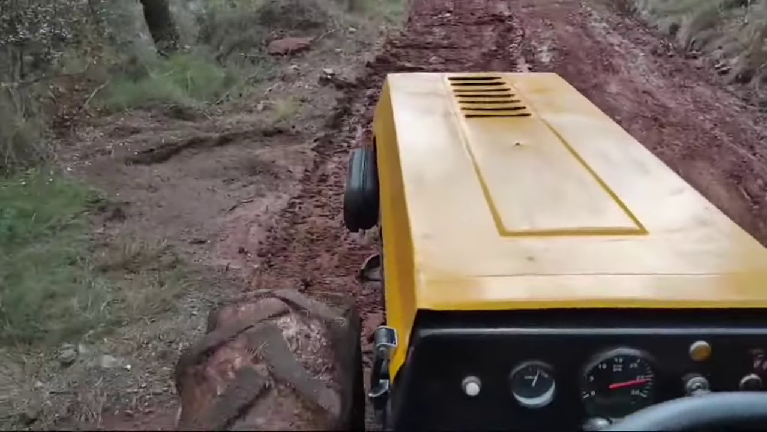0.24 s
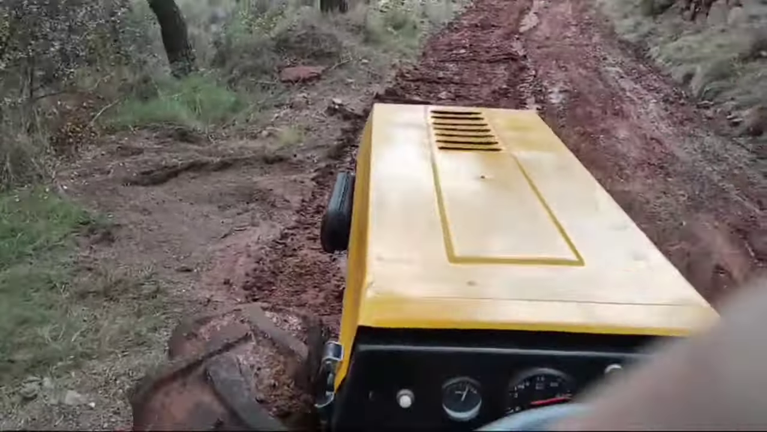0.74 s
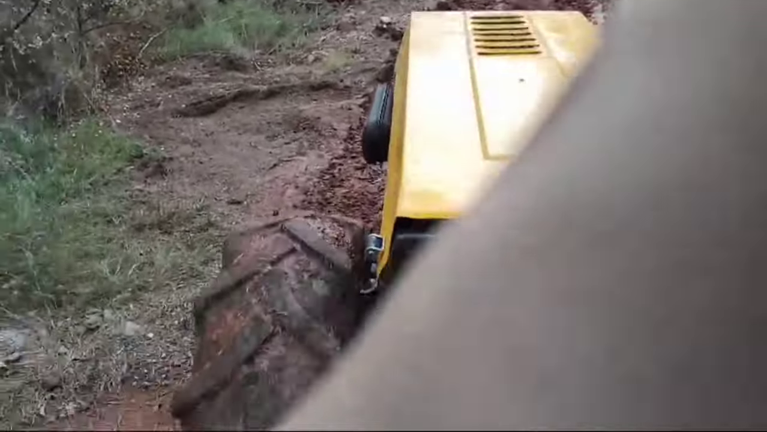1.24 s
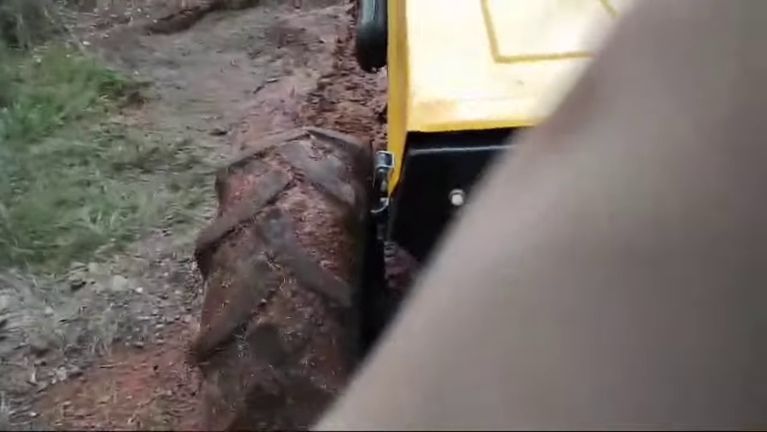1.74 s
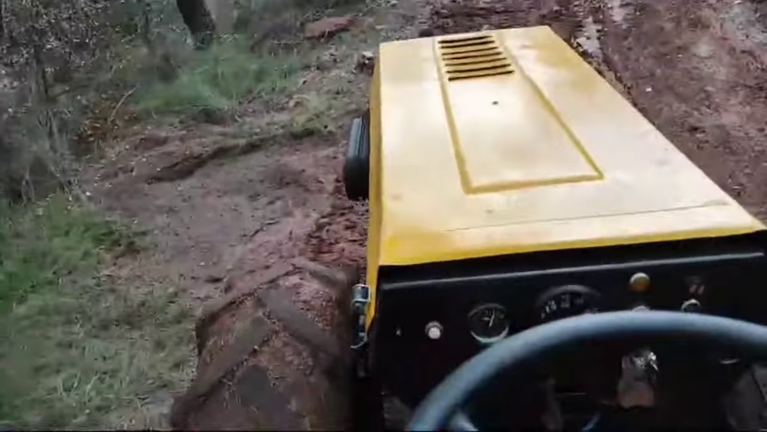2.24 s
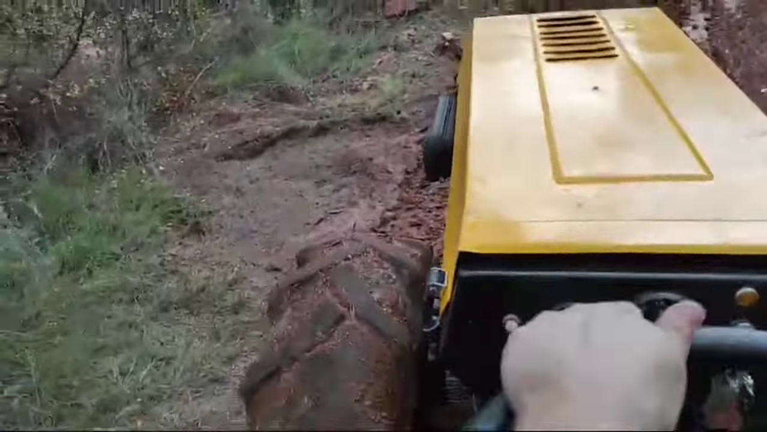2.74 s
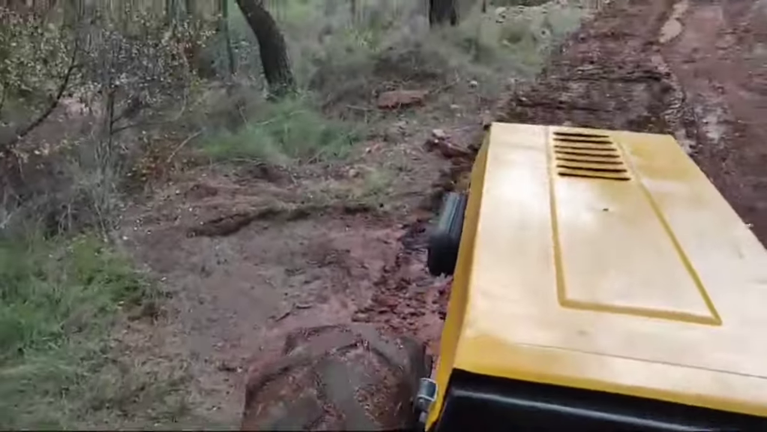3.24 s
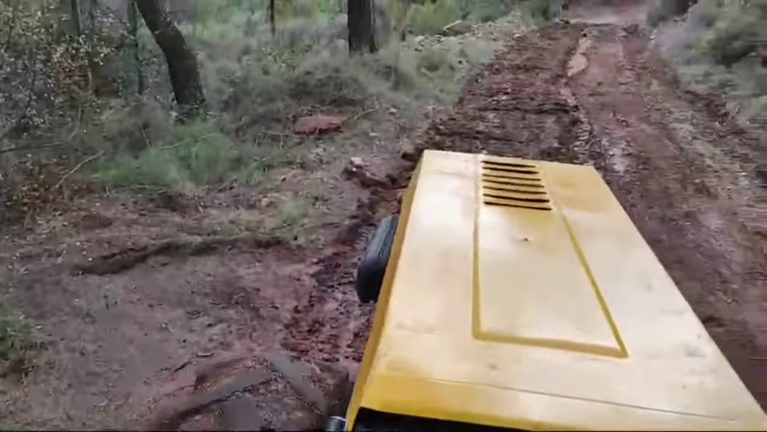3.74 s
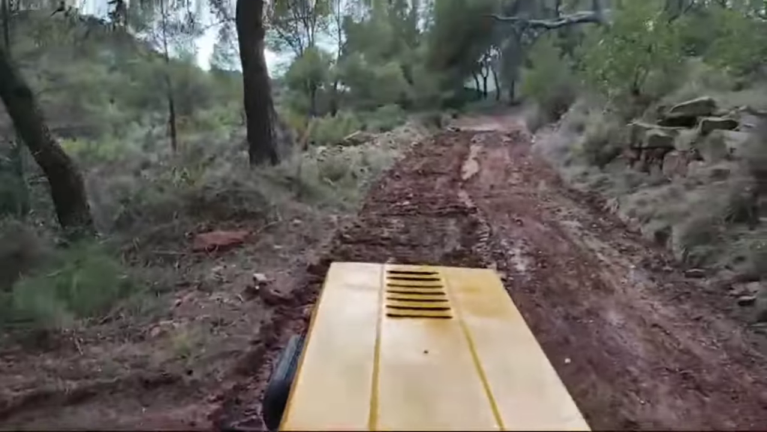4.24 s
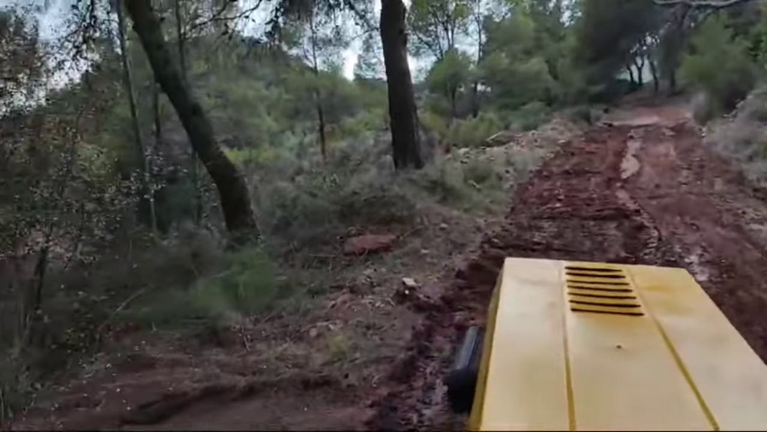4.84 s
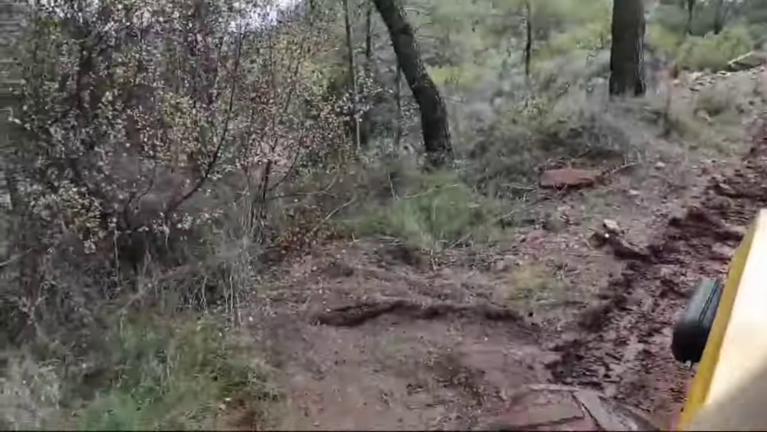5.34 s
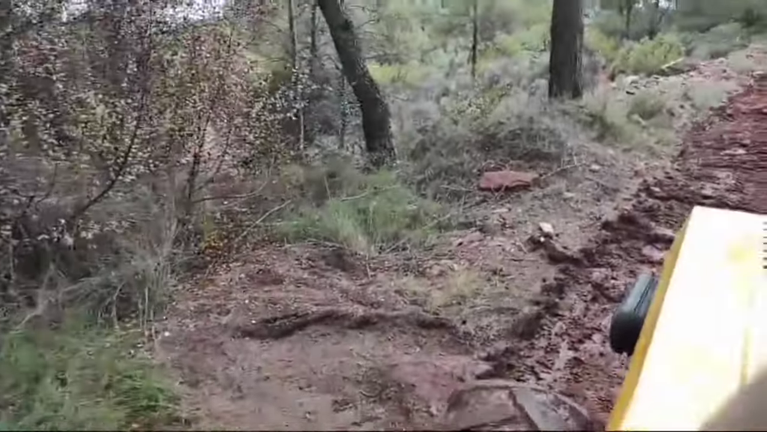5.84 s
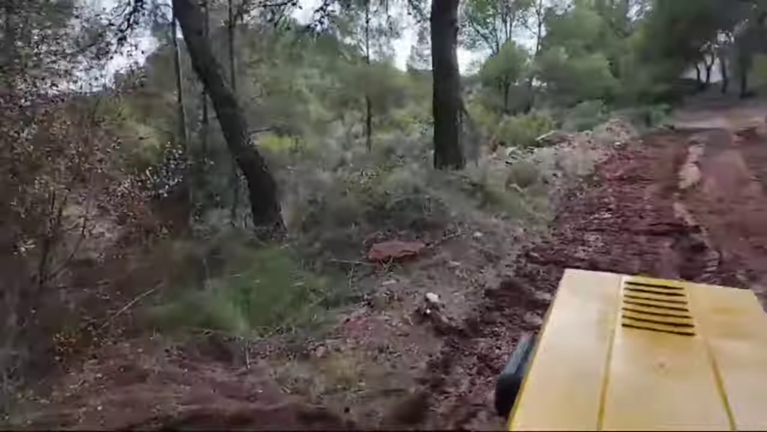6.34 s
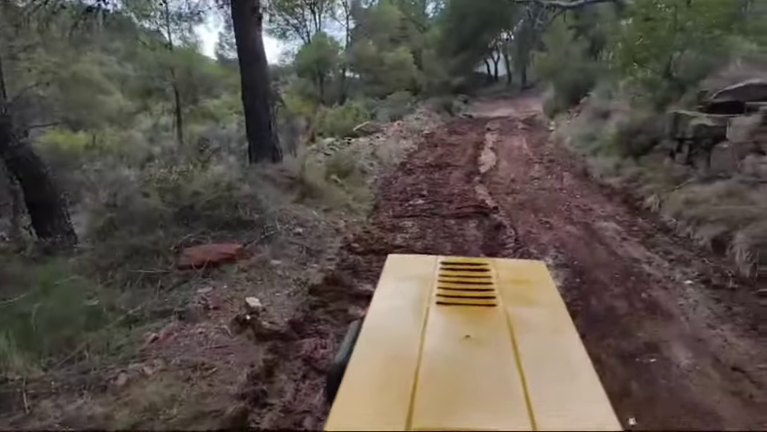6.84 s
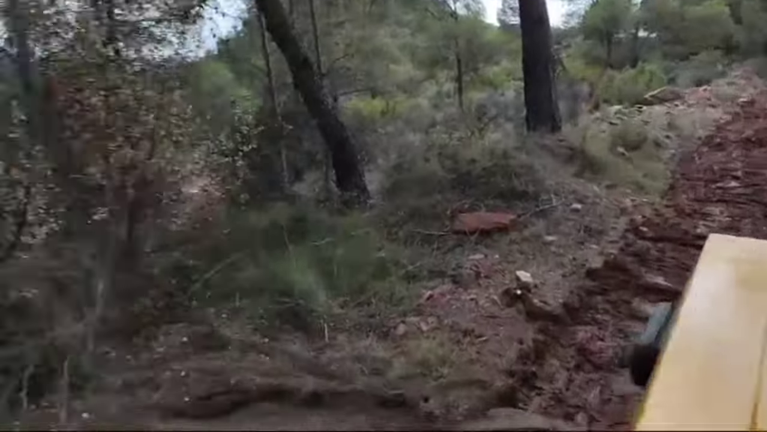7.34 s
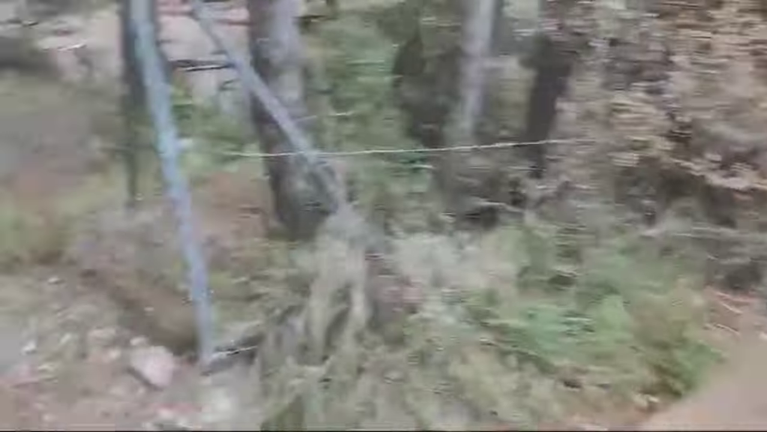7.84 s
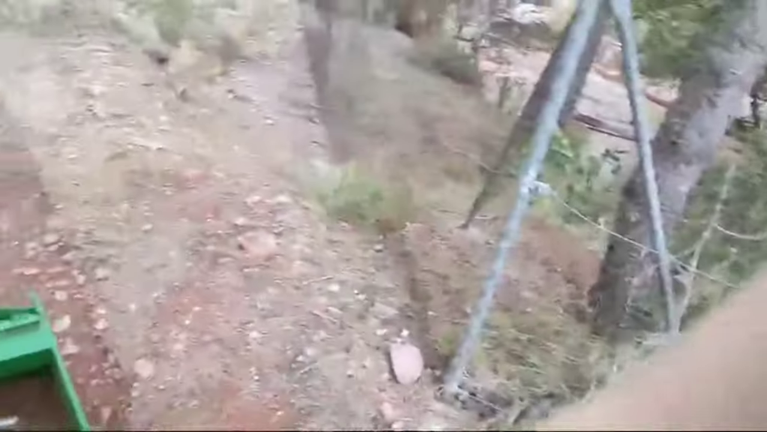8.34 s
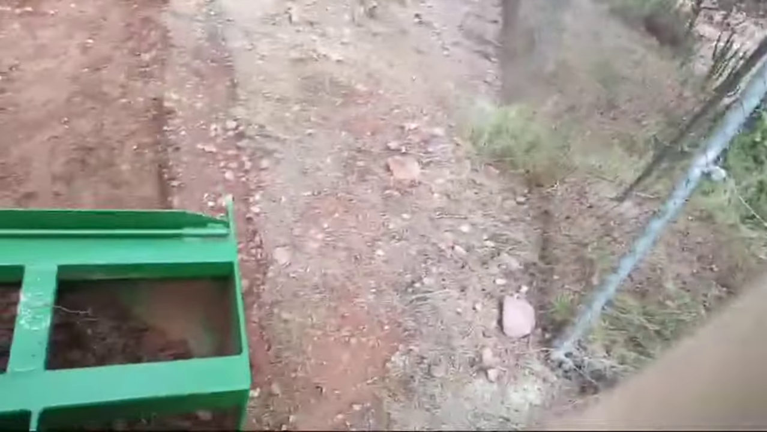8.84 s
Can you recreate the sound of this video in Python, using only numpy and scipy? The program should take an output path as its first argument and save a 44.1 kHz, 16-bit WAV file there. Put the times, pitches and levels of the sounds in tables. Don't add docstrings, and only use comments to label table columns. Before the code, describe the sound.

Heard from the driver's seat, a diesel tractor engine putters fast and evenly, clattering and knocking, its tone shifting as the head turns.

```python
import sys
import numpy as np
from scipy import signal
from scipy.fft import rfft, irfft, next_fast_len
from scipy.io import wavfile
from scipy.ndimage import uniform_filter1d, map_coordinates

SR = 44100
rng = np.random.default_rng(int(sys.argv[2]) if len(sys.argv) > 2 else 0)


def invert_db(level):
    return 10 ** (np.asarray(level, dtype=float) / 20)


def persist_wave(psi):
    counts = np.round(np.clip(psi, -1, 1) * 32767).astype(np.int16)
    wavfile.write(sys.argv[1], SR, np.atleast_2d(counts).T)


N = 400869
HZ = np.fft.rfftfreq(next_fast_len(N), 1 / SR) + 1e-3

# (time [s], four-stroke cycles [1/s])
SPEED_HZ = [(0, 14.868), (.5, 14.851), (1.3, 14.755), (2.2, 14.823), (2.9, 14.748), (3.8, 14.787),
            (4.8, 14.794), (5.5, 14.868), (6.3, 14.8), (7.1, 14.802), (7.8, 14.725), (8.4, 14.701),
            (9.09, 14.573)]
START_CYCLE, CYCLE_HZ = .095, 14.8
# (time [s], turn left [-1..1], nod down [-1..1], lean back [-1..1], lean out [-1..1])
HEAD_POSE = [(0.0, 0.087, 1.2, 0.61, -0.32), (0.5, 0.15, 0.98, 0.65, -0.42), (1.2, -0.18, 0.3, 0.34, -0.61),
             (1.55, 0.15, 0.53, 0.94, 0.14), (1.9, 0.072, 0.67, -0.13, 0.12),
             (2.8, -0.18, 0.42, -0.027, 0.88), (3.5, -0.11, 0.16, -0.66, 0.27),
             (4.0, -0.35, -0.41, -0.9, -0.33), (4.8, -0.3, -0.29, -0.97, 0.26),
             (5.2, -0.055, 0.054, -0.17, 0.51), (5.7, -0.11, 0.14, 0.15, 0.54),
             (6.1, 0.42, 0.11, 0.61, 0.29), (6.6, -0.15, -0.52, 0.14, -0.55),
             (7.3, 0.0035, -0.49, 0.39, -0.22), (7.7, 0.64, -0.28, 0.51, 1.17),
             (8.1, 0.74, 0.37, 0.15, 0.22), (8.5, 0.74, 0.19, -0.28, -1.07), (9.09, 1, 0.52, -0.21, -1.2)]
# (rest [dB], per turn [dB], per nod [dB], per lean back [dB], per lean out [dB])
PART_LEVELS_DB = [
    (-16.5, -3.5, -0.5, 2, 0),
    (-27.5, 0, -0.5, 1, -0.9),
    (-23, -1.5, 0.4, 4, 0.3),
    (-28.5, 4.5, -2.5, -3.5, 0.5),
    (-27.5, -3, 5.5, 0, 0.1),
    (-29.5, -5.5, -2.5, 1, -1.5),
    (-33, 3.5, 2.5, -3, 0.5),
    (-28, -4, 3.5, -2.5, 1.2),
    (-28, 1.2, 1.25, -0.5, 0.3),
    (-28, 3, -1, -2.5, 3),
]
# (rest [dB], per turn [dB], per nod [dB], per lean back [dB], per lean out [dB])
PART_PANS_DB = [
    (5, 5, -2.1, 1, -0.5),
    (7.5, 1.5, -1, 1.5, 0),
    (4, 3.5, 0, 1.5, -2.5),
    (2, 0.5, 1.5, -1.5, -1.5),
    (7.5, 4, -6.5, 5.5, 3.5),
    (13.5, -1, 4, 0, 4),
    (19, 6, -9, -13, 13),
    (3.5, -5.5, 2.5, -3, 0.5),
    (-1.5, 4, -1.5, 0, 1.5),
    (7, 13, -4.5, -3, 7),
]
# (at rest [s], per turn [s], per nod [s])
PORT_LAG_S = (.00004, -0.0003, 0.00013)
# (frequency [Hz], left [dB], right [dB])
PORT_COLOUR = [(1355, -6, -5.5), (1710, 1, -14), (3010, -5, -14.5), (4390, -11, -7), (4300, -4.5, -7.5),
               (6400, -9.5, -3.5), (7470, -5.5, 5), (8380, 3.5, -1), (9160, -1.5, -1), (9510, -10, -41),
               (10600, -20, -40), (10630, -15.5, -43), (12300, -33, -21), (15300, -32, -38)]
FAN_DB, FAN_PER_TURN_DB = -45.5, 0.5
# (time [s], peak level [dB], frequency [Hz])
LOW_THUDS = [(0.392, -19, 152), (0.525, -13, 152), (0.726, -28, 178), (0.827, -8.5, 181),
             (1.474, -31, 163), (1.563, -31, 169), (1.812, -19, 151), (1.9, -15, 159), (2.015, -24, 161),
             (2.401, -13, 148), (2.666, -19, 145), (2.758, -31, 162), (3.603, -16, 179), (3.701, -18, 145),
             (4.249, -26, 162), (4.514, -22, 166), (5.53, -30, 167), (6.275, -32, 161), (6.838, -16, 151),
             (7.083, -23, 162), (7.964, -35, 161), (8.582, -32, 166)]

# (start [s], end [s])
STANCES_S = [
    (0.5, 1.4),
    (1.1, 2.57),
    (3, 4.7),
    (5.5, 7.55),
    (8, 10),
]
STANCE_TURN_S = 0.31
# (frequency [Hz], peak [share of cycle], level [dB], left minus right [dB])
PANEL_RINGS = [
    [(855, .94, -28.5, 5), (830, .22, -36, 3), (700, .9, -39, 4), (1010, .58, -40, 9), (1130, .85, -40, 6)],
    [(858, .95, -29, 3), (850, .22, -35, 2), (960, .86, -37, 12), (1010, .64, -39, 12), (1400, .57, -41, 6),
     (1900, .6, -42, 12)],
    [(1140, .97, -33, 8), (1140, .8, -37, 9), (615, .64, -32.5, -2), (860, .96, -34, 1), (705, .42, -38, 0),
     (1210, .38, -38, 10), (1940, .6, -40, 12)],
    [(1035, .62, -30, 13), (1100, .77, -30.5, 7), (1045, .94, -30.5, 12), (595, .85, -36, -3),
     (595, .05, -37, -3)],
    [(1290, .55, -37, 12), (1270, .86, -37, 9), (845, .93, -33, 7), (605, .83, -33, 1), (420, .82, -33, 5),
     (510, .6, -38, 5), (700, .3, -38, 3)],
]
PANEL_RISE_CYCLES, PANEL_FALL_CYCLES, PANEL_SCATTER_DB, PANEL_SLIP_RAD = .06, .09, 1.8, .4

# (onset [share of cycle], level [dB], decay [cycles])
VALVE_BLOWS = [(.52, 8, 0.19), (.74, 6.3, 0.19), (0.95, 5.5, 0.27), (.86, 2.5, 0.27)]

# (frequency [Hz], width [Hz], level [dB])
SUMP_MODES = [(548, 60, -2), (587, 20, 1), (621, 42, -1), (696, 110, 1)]
BLOCK_MODES = [(800, 67, -8.5), (829, 43, -2), (863, 23, -4), (940, 100, -2.5)]
BONNET_MODES = [(1006, 130, 0), (1079, 52, 1), (1137, 21, 0)]
HEAD_MODES = [(1216, 170, 10.5), (1321, 14, 13.5), (1230, 41, -18), (1470, 25, -26)]
COMBUSTION_BLOWS = [(.55, .15), (.75, .1), (.9, .08), (.15, .08)]
# (steady bed [dB], then each of four blows [dB])
CASTING_DRIVE_DB = [
    (9, -29, 2, -1, -15),
    (-4.5, -26, -4, -8.5, -1),
    (-4, -4.5, -5, 3, -28),
    (12, 6, -17, 3, -14),
]
# (multiple of cycle rate [-], level against ring [dB])
WHINE_LINES = [
    [(40, -10), (42, -16.5), (43.3, -16.5), (48, -12.5)],
    [(57.86, -11.5), (55.9, -12.5)],
    [(71.2, -15), (76.3, -10), (66.9, -13)],
    [(86, -19)],
]
WHINE_WANDER_RAD, WHINE_SWELL_DB = 0.26, 3
# (onset [share of cycle], level against one cycle of rattle [dB])
FIRING_RAPS = [
    [(.58, -18.5)],
    [(.86, -16.5)],
    [(.55, -15.5), (.87, -11)],
    [(.57, -13), (.85, -17)],
]
RAP_SCATTER_DB = 2

# (multiple of cycle rate [-], level [dB])
GAS_HARMONICS = [(1, -30), (2, -18), (3, -11), (4, -14), (5, -8), (6, -16.5), (7, -11), (8, -15),
                 (9, -18.5), (10, -23), (11, -11.5), (12, -8.5), (13, -20.5), (14, -5), (15, 3.5),
                 (16, -2.5), (17, -4), (18, -9), (19, -1.5), (20, -8), (21, -12), (22, -9), (23, -13),
                 (24, -12), (25, -14), (26, -26), (27, -12.5), (28, -6), (29, -16), (30, -27)]
INTAKE_GULPS = [(.148, .76), (.285, -.73), (.466, -.74), (.983, -1)]
EXHAUST_PUFFS = [(.17, -.62), (.394, 1), (.46, .47), (.692, -.7)]
MUFFLER_SLAPS = [(.285, -.58), (.576, .5), (.661, .53), (.703, -1)]
# (frequency [Hz], level [dB])
RUMBLE_COLOUR = [(30, -35), (110, -12.5), (150, -7.5), (200, -4.5), (280, -4), (350, -1), (430, -2),
                 (520, -10.5)]

# (frequency [Hz], mid need over mean [dB], side need over mean [dB], step over band rms [dB])
MUTE_LIMITS = [(700, -40, -40, -18), (1500, -30, -30, -11), (2500, -12, -12, -5), (3300, -6, -6, -1),
               (4300, -4, -4, 0), (5400, -5.5, -5.5, -1), (6400, -7.5, -7.5, -4), (7000, -18, -18, -8),
               (9300, -16, -16, -8), (9800, 6, 6, 3), (10300, 5, 5, 3), (10900, 2, 2, 3), (12500, 1, 1, 3),
               (14500, 0, 0, 3), (15300, 5, 5, 3)]
MUTE_CHANCE_DB, MUTE_SHARED = 4.5, .9
# (time [s], relief [dB])
MUTE_RELIEF = [(0, -1), (1.4, -1), (1.8, 2), (2.3, -2), (3.7, -3), (4.3, 2), (5.8, 3), (6.4, -1), (7.2, -1),
               (7.6, 4), (9.09, 2)]
MUTE_RELIEF_HZ = (9500, 10200, 11400, 12200)


def curves(table):
    s, *columns = np.transpose(table)
    return [np.interp(np.arange(N) / SR, s, c) for c in columns]


def posed(table):
    table = np.array(table)
    return table[:, :1] + table[:, 1:] @ np.array(curves(HEAD_POSE))


def colour(x, gain):
    size = next_fast_len(N)
    y = irfft(rfft(x, size) * gain, size)[..., :N]
    return y / np.sqrt(np.mean(y ** 2, axis=-1, keepdims=True))


def shape(hz, db):
    return invert_db(np.interp(np.log(HZ), np.log(hz), db))


def band(lo_hz, hi_hz, order=4):
    return 1 / np.sqrt((1 + (lo_hz / HZ) ** (2 * order)) * (1 + (HZ / hi_hz) ** (2 * order)))


def walk(rate_hz):
    k = int(SR / rate_hz)
    held = np.repeat(rng.standard_normal(N // k + 1), k)
    return 1.15 * uniform_filter1d(uniform_filter1d(held, k), k)[:N]


def pair(x, like):
    like = np.clip(like, 0, 1)
    return np.sqrt(like) * x[0] + np.sqrt(1 - like) * x[1:]


def place(x, db, pan_db, like):
    gain = invert_db(np.array([pan_db, -pan_db]) / 2)
    return x * gain * invert_db(db) * 2 / np.sqrt(np.sum(gain ** 2, axis=0) + 2 * like)


def gate(cycle, blows, bed_db, scatter_db):
    out = invert_db(bed_db)
    for share, db, decay_cycles in blows:
        since = cycle + 1 - share
        strength = invert_db(db + scatter_db * rng.standard_normal(200))[since.astype(int)]
        out = out + strength * np.exp(-(since % 1) / decay_cycles)
    return out


def fan(turn):
    hiss = colour(rng.standard_normal((2, N)), band(8200, 17400, order=8) * shape([10000, 15500], [0, -8]))
    return place(hiss * invert_db(0.69 * walk(9.0)), FAN_DB + FAN_PER_TURN_DB * turn, np.full(N, 2.5), 0)


def thuds():
    out = np.zeros(N)
    t = np.arange(int(.2 * SR)) / SR
    swell = t / 0.025 * np.exp(1 - t / 0.017)
    for s, db, hz in LOW_THUDS:
        i = int(s * SR)
        out[i:i + len(t)] += invert_db(db - 2.5) * swell * np.sin(2 * np.pi * hz * t)
    return place(out, 0, np.full(N, 4.5), 0.4)


def panels(cycle):
    t, out = np.arange(N) / SR, 0
    for (start, end), rings in zip(STANCES_S, PANEL_RINGS):
        facing = np.clip(np.minimum(t - start, end - t) / STANCE_TURN_S + .5, 0, 1)
        for hz, share, db, pan_db in rings:
            since = cycle + 1.5 - share
            off = since % 1 - .5
            scatter, slip = rng.standard_normal((200, 2))[since.astype(int)].T
            swell = np.exp(-(off / np.where(off < 0, PANEL_RISE_CYCLES, PANEL_FALL_CYCLES)) ** 2)
            tone = np.cos(2 * np.pi * hz / CYCLE_HZ * off + PANEL_SLIP_RAD * slip)
            ring = swell * invert_db(PANEL_SCATTER_DB * scatter) * tone
            out = out + place(facing * ring / ring.std(), db, np.full(N, pan_db), 1)
    return out


def clatter(cycle, levels_db, pans_db):
    hz, *ports_db = np.transpose(PORT_COLOUR)
    ports = np.array([shape(hz, db) for db in ports_db])
    swell = gate(cycle, VALVE_BLOWS, -1.3, 2.9)
    flutter_db = walk(9.8)
    bands = [(1490, 2960, 0.29, 2.1), (2940, 7410, 0.44, 1.1), (6960, 14300, 0.86, 2.2)]
    out = 0
    for k, (lo_hz, hi_hz, depth, grain_db) in enumerate(bands):
        ticks = rng.standard_normal((2, N)) * invert_db(grain_db * rng.exponential(size=(2, N)))
        ticks = ticks * swell ** depth * invert_db(0.3 * depth * flutter_db + 0.83 * walk(20))
        ticks = colour(ticks, ports * band(lo_hz, hi_hz, order=6))
        out = out + place(ticks, levels_db[k], pans_db[k], 0)
    return out


def whine(cycle, lines):
    out = 0
    for k, db in lines:
        level = invert_db(db + WHINE_SWELL_DB * walk(2.08)) * np.sqrt(2)
        out = out + level * np.cos(2 * np.pi * k * cycle + WHINE_WANDER_RAD * walk(3.13))
    return out


def raps(cycle, table):
    out = np.zeros(N)
    for share, db in table:
        count = np.floor(cycle + 1 - share).astype(int)
        strength = invert_db(db + RAP_SCATTER_DB * rng.standard_normal(200))
        out[1:] += np.diff(count) * strength[count[1:]] * np.sqrt(SR / CYCLE_HZ)
    return out


def knock(cycle, levels_db, pans_db):
    pattern = rng.standard_normal((2, 3, 2048))[:, :, (cycle % 1 * 2048).astype(int)]
    drift_rad = 0.7 * walk(1.622)
    same = np.cos(drift_rad) * pattern[0] + np.sin(drift_rad) * pattern[1]
    fresh, out = rng.standard_normal((3, N)), 0
    castings = [(SUMP_MODES, .8, .3), (BLOCK_MODES, .7, .3), (BONNET_MODES, .55, .3), (HEAD_MODES, .3, .25)]
    for k, (modes, like, repeat) in enumerate(castings):
        bed_db, *blows_db = CASTING_DRIVE_DB[k]
        blows = [(share, db, decay) for (share, decay), db in zip(COMBUSTION_BLOWS, blows_db)]
        force = uniform_filter1d(gate(cycle, blows, bed_db, 1.3), size=150)
        push = (np.sqrt(repeat) * same + np.sqrt(1 - repeat) * fresh) * force
        push = push + raps(cycle, FIRING_RAPS[k])
        response = sum(invert_db(db) / (1 + 2j * (HZ - hz) / width) for hz, width, db in modes)
        ring = colour(pair(push, like), response * band(520, 2000, order=2))
        out = out + place(ring + whine(cycle, WHINE_LINES[k]), levels_db[k], pans_db[k], like)
    return out


def pipes(cycle, levels_db, pans_db):
    exhaust_db, intake_db, upper_db = levels_db
    exhaust_pan_db, intake_pan_db, upper_pan_db = pans_db
    pulses = (INTAKE_GULPS, EXHAUST_PUFFS, MUFFLER_SLAPS)
    parts = np.zeros((3, N))
    for k, db in GAS_HARMONICS:
        part = (k > 9) + (k > 20)
        lag = np.angle(1 / (1 - (k / 14.4) ** 2 + 1j * k / 14.4 / 20))
        beat = np.angle(sum(size * np.exp(-2j * np.pi * k * share) for share, size in pulses[part]))
        rough = .03 if k < 20 else .08
        phase = 2 * np.pi * k * cycle + beat + lag + rough * 2 * walk(3.12)
        parts[part] -= invert_db(db + 12 * rough * walk(4)) * np.cos(phase)
    intake, exhaust, upper = parts / parts.std(axis=1, keepdims=True)
    rumble_gain = shape(*np.transpose(RUMBLE_COLOUR)) * band(25, 434)
    rumble = colour(pair(rng.standard_normal((3, N)), 0.98), rumble_gain)
    rumble = rumble * invert_db(1.57 * walk(4.9))
    return (place(intake, intake_db, intake_pan_db, 0.82) + place(exhaust, exhaust_db, exhaust_pan_db, 0.76)
            + place(upper, upper_db - 5.5, upper_pan_db, 0.73)
            + place(rumble, upper_db - 0.5, upper_pan_db, 0.53))


def mute(x):
    n, line = np.arange(2048), np.arange(1024)
    window = signal.windows.kaiser_bessel_derived(2048, 4 * np.pi)
    basis = window[:, None] * np.cos(np.pi / 1024 * np.outer(n + 512.5, line + .5))
    blocks = np.pad(x, ((0, 0), (1646, 2048 - (N + 1646) % 1024))).reshape(2, -1, 1024)
    z = (np.concatenate([blocks[:, :-1], blocks[:, 1:]], axis=2) @ basis).transpose(0, 2, 1)
    hz = line * SR / 2048
    s = (np.arange(z.shape[2]) * 1024 - 622) / SR
    which = np.where(hz < 7000, hz // 172, 41 + (hz - 7000) // 345).astype(int)
    starts = np.flatnonzero(np.diff(which, prepend=-1))
    lengths = np.diff(np.append(starts, len(hz)))
    band_hz = hz[starts]
    level_db = 10 * np.log10(np.add.reduceat(z ** 2, starts, axis=1) / lengths[:, None] + 1e-18)
    chance = pair(rng.standard_normal((3, *level_db.shape[1:])), MUTE_SHARED)
    db = level_db + MUTE_CHANCE_DB * 1.4 * uniform_filter1d(chance, size=2)
    relief_db = np.outer(np.interp(band_hz, MUTE_RELIEF_HZ, [0, 1, 1, 0]),
                         np.interp(s, *np.transpose(MUTE_RELIEF)))
    at_hz, *need_db, step_db = np.transpose(MUTE_LIMITS)
    need_db = np.array([np.interp(band_hz, at_hz, d, left=-99) for d in need_db])
    keep = db - db.mean(axis=2, keepdims=True) > need_db[:, :, None] - relief_db
    step = invert_db(level_db + np.interp(band_hz, at_hz, step_db, left=-30)[:, None])
    step = np.repeat(step, lengths, axis=1)
    z = np.round(z / step) * step * np.repeat(keep, lengths, axis=1)
    frames = z.transpose(0, 2, 1) @ basis.T / 512
    return (frames[:, :-1, 1024:] + frames[:, 1:, :1024]).reshape(2, -1)[:, 622:622 + N]


def scene():
    cycle = START_CYCLE + np.cumsum(curves(SPEED_HZ)[0]) / SR
    db, pan_db = posed(PART_LEVELS_DB), posed(PART_PANS_DB)
    turn, nod = curves(HEAD_POSE)[:2]
    left, right = (fan(turn) + thuds() + panels(cycle) + clatter(cycle, db[7:], pan_db[7:])
                   + knock(cycle, db[3:7], pan_db[3:7]) + pipes(cycle, db[:3], pan_db[:3]))
    rest_s, turn_s, nod_s = PORT_LAG_S
    lag = (rest_s + turn_s * turn + nod_s * nod) * SR
    return np.array([map_coordinates(left, [np.arange(N) - lag], mode="mirror"), right])


def low_pass(x):
    return signal.sosfilt(signal.butter(12, 15400, fs=SR, output="sos"), x)


def record(dry):
    peaks = np.clip(np.tanh(0.91 * dry) / 0.88, -1, 1)
    turn = np.array([[1, 1], [1, -1]]) / np.sqrt(2)
    mix = turn @ mute(turn @ peaks)
    return low_pass(mix)


dry = scene()
out = record(dry)
persist_wave(out)
```